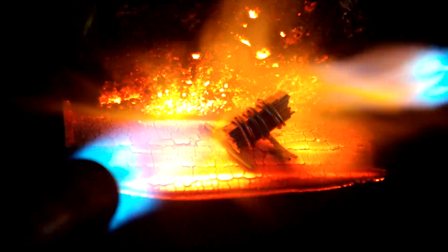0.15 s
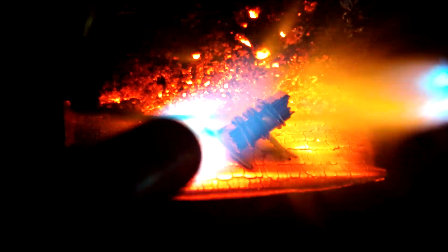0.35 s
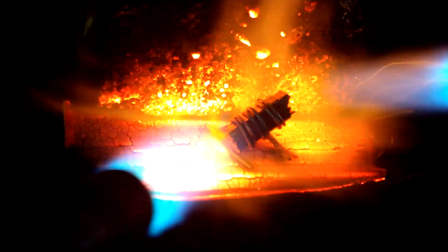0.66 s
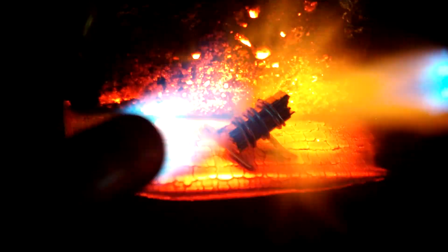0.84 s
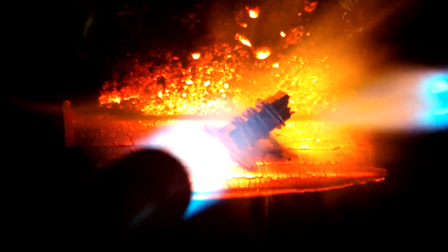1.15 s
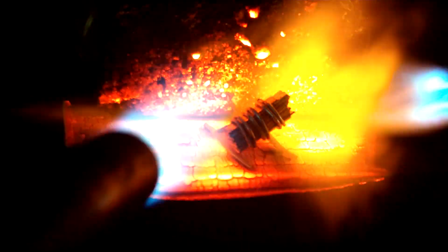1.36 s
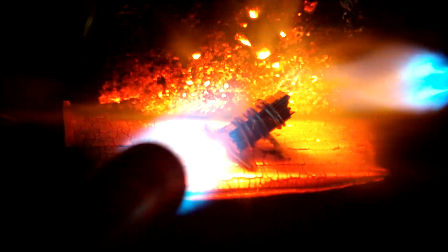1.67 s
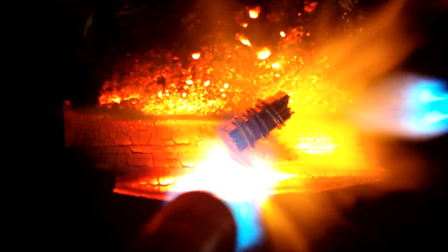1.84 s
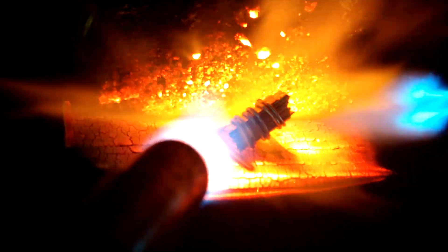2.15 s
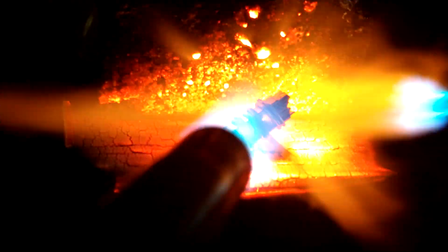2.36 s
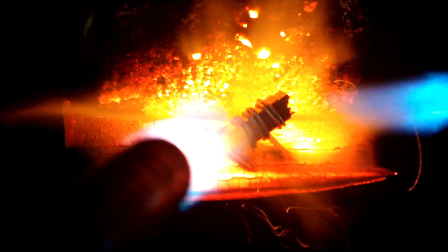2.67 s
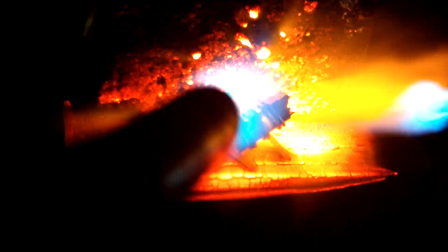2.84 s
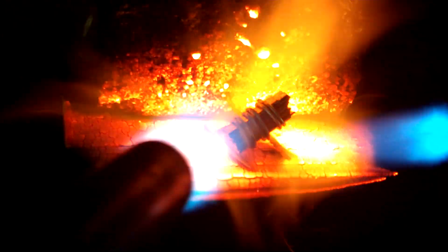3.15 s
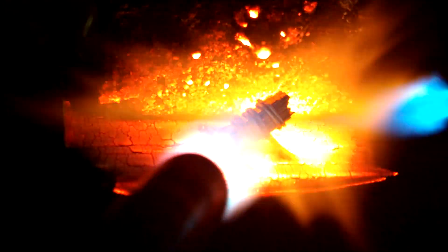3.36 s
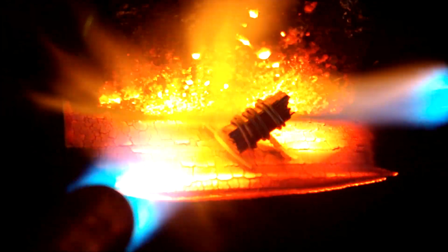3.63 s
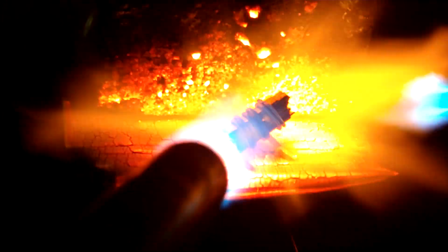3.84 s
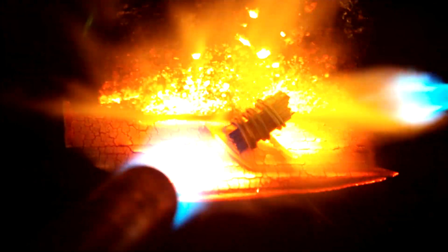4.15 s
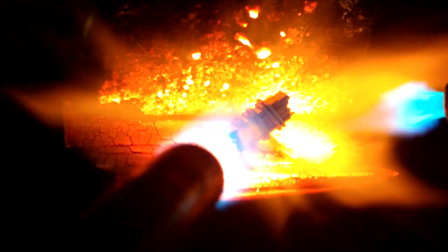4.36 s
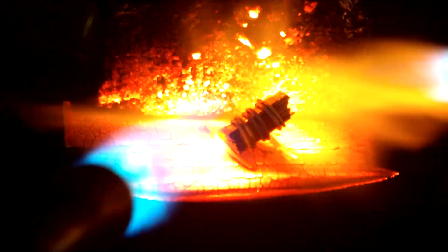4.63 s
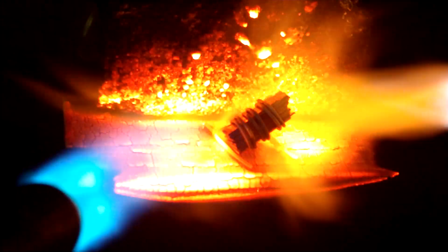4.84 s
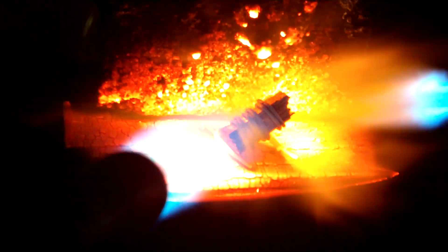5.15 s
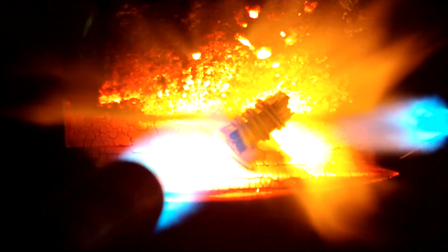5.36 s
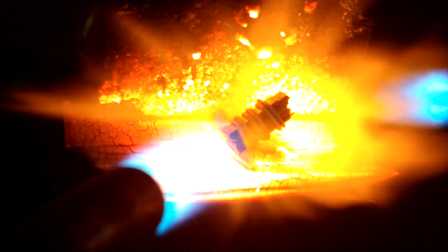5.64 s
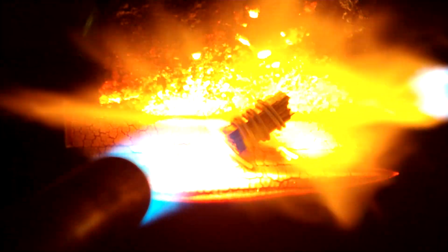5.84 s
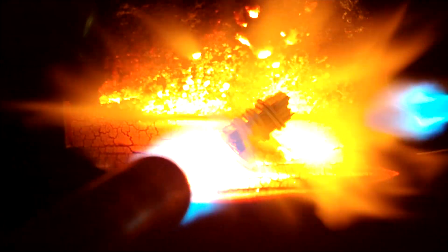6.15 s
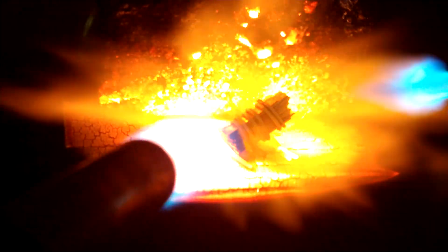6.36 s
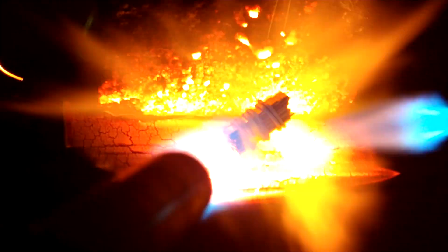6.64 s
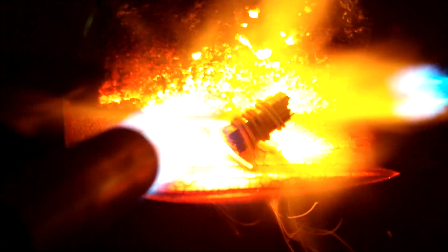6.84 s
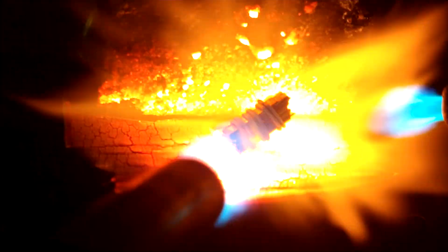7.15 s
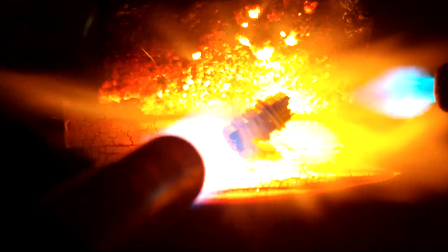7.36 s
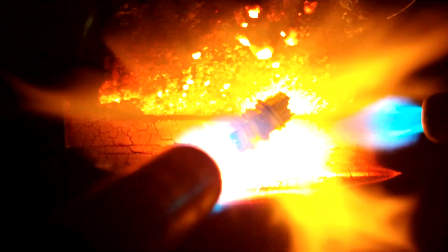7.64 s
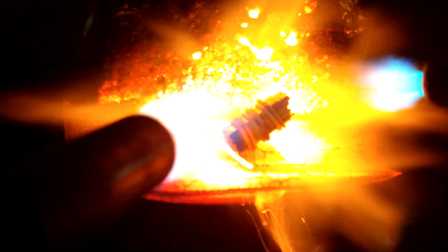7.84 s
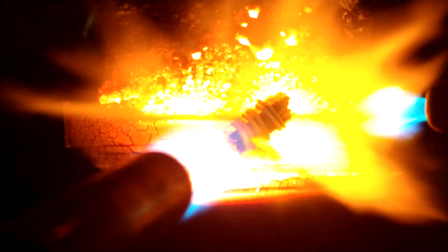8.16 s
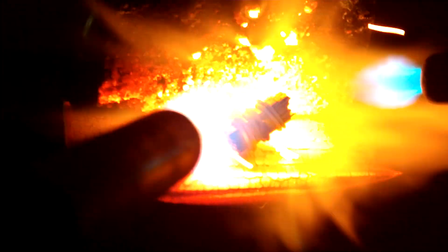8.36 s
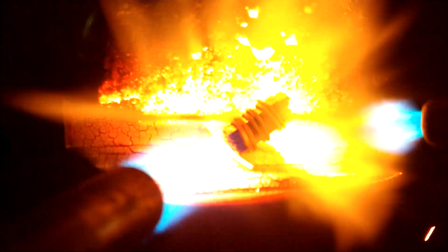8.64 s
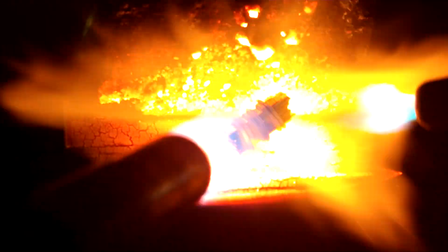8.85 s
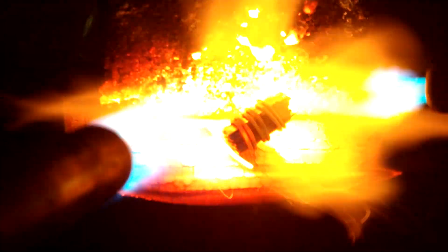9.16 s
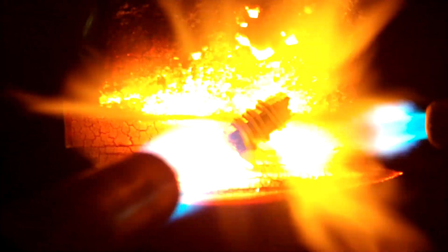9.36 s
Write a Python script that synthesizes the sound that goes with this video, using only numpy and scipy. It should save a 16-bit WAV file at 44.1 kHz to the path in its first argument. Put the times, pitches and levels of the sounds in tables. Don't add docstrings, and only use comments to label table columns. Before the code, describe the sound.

Close, constant torch roar in a small room, starting at full force and never stopping. It is a thick rush of gas with little deep bass and a slightly dulled top. Rough, hollow tube tones waver within it, the higher one pulsing and climbing in pitch early on. Small gusts and shifting reflections flutter the hiss; the overall level stays tightly held.

```python
import sys
import numpy as np
from scipy import signal
from scipy.fft import rfft, irfft
from scipy.io import wavfile
from scipy.ndimage import uniform_filter1d

SR = 44100
rng = np.random.default_rng(int(sys.argv[2]) if len(sys.argv) > 2 else 0)


def attenuation_scalar(level_db):
    decades = np.asarray(level_db, float) / 20
    return 10 ** decades


def master(y):
    cut = np.clip(np.atleast_2d(y).T, -1, 1)
    pcm = np.round(cut * 32767)
    wavfile.write(sys.argv[1], SR, pcm.astype(np.int16))


N = 418950
SIZE, HOP = 2048, 512


def evened(x):
    return x / np.sqrt(np.mean(x ** 2) + 1e-20)


def bump(hz, centre_hz, width_hz):
    return 2. ** (-(2 * (hz - centre_hz) / width_hz) ** 2)


def below(hz, edge_hz):
    return 1 / (1 + (hz / edge_hz) ** 8)


def plateau(t, start, end, edge_s):
    rise = np.tanh((t - start) / edge_s)
    fall = np.tanh((t - end) / edge_s)
    return (rise - fall) / 2


def drift(shape, bins, frames):
    field = uniform_filter1d(rng.standard_normal(shape), size=bins, axis=0)
    return evened(uniform_filter1d(field, size=frames, axis=1))


def slow_noise(width_hz):
    pole = np.exp(-np.pi * width_hz / SR)
    z = rng.standard_normal((N, 2)) @ [1, 1j]
    return signal.lfilter([1], np.poly([pole, pole]), z)


# centre in Hz, width in Hz, lift in dB.
ROOM_MODES = [(95, 22, 3.5), (135, 20, -3), (156, 16, 4), (197, 25, -3), (217, 14, 3), (260, 25, -3),
              (287, 20, 3), (322, 20, -4.5), (355, 20, 3), (388, 20, -5), (428, 14, 3.5), (765, 45, 1.2),
              (850, 60, -1)]


def room(x):
    hz = np.fft.rfftfreq(N, 1 / SR)
    modes_db = sum(db * bump(hz, f, w) for f, w, db in ROOM_MODES)
    return irfft(rfft(x) * attenuation_scalar(modes_db), N)


def charcoal_spit(middle_s=8.362, half_s=.017, hz=4810, rise_hz_per_s=-800, db=-27):
    t = np.arange(N) / SR - middle_s
    cycles = hz * t + rise_hz_per_s * t ** 2 / 2
    return attenuation_scalar(db) * np.exp(-(t / half_s) ** 4) * np.sin(2 * np.pi * cycles)


def singing(events, rest_db, t):
    wander_hz, throb_db, edge_s = 9, .5, 0.029
    start, length, from_hz, to_hz, db = np.transpose(events)
    end = start + length
    times = np.maximum.accumulate(np.ravel([start, end], "F"))
    pitch_hz = np.interp(t, times, np.ravel([from_hz, to_hz], "F"))
    pitch_hz = pitch_hz + wander_hz * drift((1, len(t)), bins=1, frames=3)[0]
    lift_db = (db - rest_db) @ plateau(t, start[:, None], end[:, None], edge_s)
    level_db = rest_db + lift_db + throb_db * drift((1, len(t)), bins=1, frames=6)[0]
    return [np.interp(np.arange(N) / SR, t, curve) for curve in (pitch_hz, level_db)]


def tube(pitch_hz, level_db, width_hz, steady):
    flutter_db, flutter_hz = 1.6, 40
    swing = slow_noise(width_hz)
    swing = swing / (abs(swing) + 1e-9) ** np.clip(steady, 0, 1)
    tone = (swing * np.exp(2j * np.pi * np.cumsum(pitch_hz) / SR)).real
    flicker_db = flutter_db * evened(slow_noise(flutter_hz).real)
    return attenuation_scalar(level_db) * evened(tone * attenuation_scalar(flicker_db))


# start in seconds, length in seconds, first pitch in Hz, last pitch in Hz, level in dB.
LOWER_SWELLS = [(0.0, .08, 797, 780, -20), (.12, 0.1394, 820, 780, -22.5), (.27, 0.0995, 751, 750, -22),
                (.4, 0.21, 780, 805, -22.5), (.7, 0.3544, 767.5, 791, -20.5), (1.27, 0.098, 780, 820, -23),
                (1.45, .15, 789.7, 770, -24.5), (1.75, 0.1988, 792.4, 759, -24),
                (2.02, 0.199, 771.4, 800, -22), (2.33, 0.10035, 790.5, 810, -23),
                (2.5, .62, 780.8, 809.4, -24.5), (3.65, .68, 813, 780.2, -25), (4.37, .25, 770.6, 790, -23),
                (4.85, 0.351, 771, 791.3, -23), (5.38, .2, 789, 772, -26), (5.7, .5, 799.4, 782, -23.5),
                (6.35, .17, 763, 740, -22), (6.53, .45, 790, 760, -24.5), (7.2, .15, 799, 794, -23.5),
                (7.5, 0.478, 796, 759.5, -24), (8.05, .12, 780, 800, -20.5), (8.19, 0.081, 810, 797.5, -19),
                (8.3, .12, 780, 771, -24), (8.55, .16, 810, 770, -22.5), (8.95, .1, 806, 810, -27),
                (9.12, .07, 790, 765.8, -25), (9.24, .12, 783, 762, -21.5)]


def lower_tube(t):
    pitch_hz, level_db = singing(LOWER_SWELLS, -27, t)
    return tube(pitch_hz, level_db, width_hz=95, steady=0.68)


# start in seconds, length in seconds, first pitch in Hz, last pitch in Hz, level in dB.
UPPER_SURGES = [(0.0, 0.16, 880, 960, -25), (.15, 0.097, 1050, 1044, -21), (.4, .14, 920.4, 870, -23),
                (.6, 0.2, 870.8, 930, -20.5), (1.95, .09, 964.3, 980, -25), (2.1, 0.16, 830.5, 915, -25),
                (2.36, .06, 830, 860, -24), (2.49, 0.11, 849.2, 970, -22), (2.69, .35, 955, 1015, -23),
                (3.07, 0.52, 1005, 1005, -21), (3.54, .1, 998.5, 952, -31), (3.66, .15, 951.2, 1019, -22.5),
                (3.85, 0.077, 1070, 1054, -24), (3.96, .14, 969, 1060, -24), (4.13, .18, 1038, 1023, -27.5),
                (4.33, 0.4, 999.5, 1038, -24), (4.85, .38, 1059, 1095, -27.5),
                (5.27, 0.26, 1033, 1062, -22.5), (5.53, .12, 1050, 1005, -21.5),
                (5.66, .13, 1030, 1060, -19.5), (5.88, 0.37, 1033, 1055, -26),
                (6.31, .13, 1009, 1044, -19.5), (6.47, 0.078, 1044, 1030, -20),
                (6.6, 0.16, 1034, 1018, -21), (6.77, 0.19, 1037, 1032, -25),
                (7.06, 0.076, 1061, 1076, -22.5), (7.22, .16, 1022, 1036, -23),
                (7.39, 0.19, 1012, 988, -21), (7.58, .17, 1025, 1050, -23.5),
                (7.79, 0.18, 971.6, 1020, -22), (8.03, 0.073, 990, 1021, -20),
                (8.2, 0.076, 1083, 1050, -26), (8.33, 0.15, 944.5, 1028, -21.5),
                (8.47, 0.12, 1010, 950, -23), (8.71, 0.18, 1039, 1064, -25),
                (8.92, 0.16, 1047, 1062, -21.5), (9.09, .045, 1046, 800, -19), (9.22, .09, 1025, 1028, -30),
                (9.32, 0.066, 1038, 1032, -20.5), (9.43, 0.084, 1023, 1026, -19.5)]


def upper_tube(t):
    pitch_hz, level_db = singing(UPPER_SURGES, -33.5, t)
    return tube(pitch_hz, level_db, width_hz=62, steady=0.7)


# frequency in Hz, level in dB per Hz.
FLAME_COLOUR = [(20, -46), (50, -36), (70, -33), (95, -17), (200, -8.5), (400, -2.5), (800, -6.5),
                (1600, -6.5), (3200, -13), (6000, -14.5), (7850, -11.5), (8050, -27), (8400, -37),
                (8800, -51)]
# centre in Hz, width in Hz, lift in dB.
STANDING_PATHS = [(139.2, 92, 8), (334, 44, -8), (354.7, 19, 13), (366, 157, -13), (445, 86, -3.5),
                  (586, 98, -4), (888, 514, 4.5), (1230, 48, 3.5), (1475, 100, -3.5), (1913, 256, -5),
                  (2512, 49, -6), (2543, 66, 5.5), (2860, 470, -3), (3243, 99, 2), (3646, 130, -3.5),
                  (3853, 72, 3.5), (4355, 55, -9.5), (5060, 200, -4), (6050, 300, -1), (6517, 515, 8),
                  (7140, 270, 0), (7550, 140, 0.5), (7900, 280, -9.5)]


def steady_colour(hz):
    f, level_db = np.transpose(FLAME_COLOUR)
    colour_db = np.interp(np.log(hz + 1), np.log(f + 1), level_db)
    return colour_db + sum(db * bump(hz, f, w) for f, w, db in STANDING_PATHS)


# time in seconds, hiss of the gas jets in dB.
TORCH_NEARNESS = [(0.0, -15.5), (0.13, -17.5), (0.33, -15.5), (0.9, -17), (1.4, -19), (1.9, -19.5),
                  (2.2, -19.5), (3.3, -19.5), (3.8, -19.5), (4.5, -19.5), (5.0, -19.5), (6.3, -20.5),
                  (6.85, -20.5), (7.1, -20.5), (9.3, -20), (9.5, -19.5)]


def nearness(hz, t):
    far_db = -20
    near_db = np.interp(t, *np.transpose(TORCH_NEARNESS)) - far_db
    roar_db = -0.17 + (0.92 - 1) * near_db
    rumble_db = -2.5 + (0.8 - 1) * near_db - 0.3 * drift((1, len(t)), bins=1, frames=6)
    roar_band, rumble_band = below(hz, 1410), below(hz, 330)
    return far_db + near_db - 12 + (roar_band - rumble_band) * roar_db + rumble_band * rumble_db


# start in seconds, end in seconds.
HAND_POSES = [
    (-1, 1.05),
    (1.05, 3.55),
    (3.55, 4.67),
    (4.67, 5.95),
    (5.95, 11),
]
# centre in Hz, width in Hz, lift in dB.
CLOSE_PATHS = [(334, 154, -8), (980, 130, 0.5), (1113, 50, -5), (1717, 120, -8), (2810, 190, -4.5),
               (3160, 230, 5), (3360, 140, -3), (3900, 120, 1.5), (3920, 140, -0.5), (4450, 240, -10),
               (4760, 62, -1), (5620, 1430, 6.5), (5740, 310, -5.5), (8000, 1400, 3)]
AIMED_PATHS = [(1730, 130, -1.5), (3000, 650, -1.5), (3200, 100, 3), (3880, 140, 4.5), (4150, 120, -3.5),
               (4540, 190, -1), (5300, 630, 0), (6600, 800, 0.4)]
TURNED_PATHS = [(3900, 140, 1), (4090, 140, -6), (4390, 370, 2), (5100, 940, -2.5), (6600, 600, -1.5)]
DRAWN_BACK_PATHS = [(885, 82, -2.5), (2240, 1500, 0.5), (3780, 500, -2.5), (4200, 590, -2),
                    (5090, 140, -1.5), (5300, 640, 3.5), (7600, 1700, -5.5)]
SETTLED_PATHS = [(854, 90, -4), (1830, 200, 2.5), (2050, 180, -3.5), (2887, 70, -0.5), (3540, 220, 1.5),
                 (3800, 140, -2.5), (4200, 520, 1), (4760, 80, -1), (5060, 200, -2.5), (5640, 1400, -1.5),
                 (5840, 140, 0), (6710, 560, -3), (6820, 100, 3.5), (7820, 800, 0.5)]


def pose_reflections(hz, t):
    pose_paths = (CLOSE_PATHS, AIMED_PATHS, TURNED_PATHS, DRAWN_BACK_PATHS, SETTLED_PATHS)
    field_db = 0
    for (start, end), paths in zip(HAND_POSES, pose_paths):
        f, w, db = np.transpose(paths)
        depth = np.minimum(50 / w, .3)[:, None]
        waver = 1 + depth * drift((len(f), len(t)), bins=1, frames=3)
        held = plateau(t, start, end, edge_s=.13)
        field_db = field_db + db * bump(hz, f, w) @ (waver * held)
    return field_db


# middle in seconds, half length in seconds, centre in Hz, width in Hz, lift in dB.
SWEEP_GLINTS = [(.78, 0.33, 3220, 150, 3), (5.296, .2, 5450, 258, -1), (1.501, .4, 4480, 250.3, -5),
                (1.702, 0.31, 5300, 805, -2), (2.677, 0.15, 4436, 220, 9.5), (3.158, 0.15, 4420, 320, 9.5),
                (3.2, .2, 3200, 500, 1.5), (2.701, 0.73, 5100, 426, 4), (2.923, 0.063, 5100, 900, 4.5),
                (4.9, 0.23, 3800, 497.7, -5), (4.85, .12, 4550, 200, 3), (5.05, 0.11, 5300, 500, 0.5),
                (5.599, 0.55, 4450, 299.8, -3.5), (6.701, .36, 3034, 220.5, -4.5),
                (9.147, 0.027, 1142, 500, -6), (.12, 0.13, 3900, 250, -3.5), (.6, 0.27, 1260, 120, 1.5),
                (.6, 0.099, 4200, 200, 6), (1.83, 0.11, 6510, 1300, -2.5), (1.9, .12, 3900, 200, -2),
                (2.902, .5, 3620, 250, 2.5), (3.703, .1, 6690, 1504, -2), (4.216, 0.096, 6040, 1794, -1.5),
                (4.399, .2, 3610, 200, 0), (5.45, 0.55, 5420, 220, -0.5), (5.201, .3, 4780, 180, 2),
                (5.3, .12, 4300, 250, -6), (5.702, 0.31, 7450, 600, 3.5), (5.77, .04, 1239, 119.5, 5),
                (6.05, .12, 7650, 506, -4), (6.95, 0.17, 4150, 350, 4), (7.3, 0.14, 4020, 400.2, -0.5),
                (7.6, .25, 3000, 249, -2.5), (8.55, .15, 3982, 400, 3.5), (8.78, 0.093, 1230, 120, 5.5),
                (9.202, .3, 5090, 200.4, 7), (9.298, 0.21, 7600, 501, -1.5), (8.171, 0.071, 980, 120.4, -4)]
# middle in seconds, half
# length in seconds, centre in Hz, width in Hz, lift in dB.
MORE_GLINTS = [(2.24, .12, 6500, 500, 0.5), (2.55, .1, 6500, 500, 2), (3.05, .1, 6500, 600, 2),
               (3.4, .12, 6500, 500, 0.5), (4.0, .1, 6550, 500, 2), (4.45, .1, 6500, 500, 2.5),
               (5.09, .38, 5450, 160, 6.5), (4.95, .25, 5050, 160, 6), (4.7, .14, 5500, 700, -2),
               (2.9, .04, 4500, 2200, -1.5), (2.8, .05, 4400, 1500, 2), (1.45, .05, 4900, 160, 2),
               (5.75, .12, 4400, 200, 6), (2.35, .06, 3890, 160, 0), (3.2, .1, 3600, 160, 4),
               (6.45, .12, 7500, 300, 1), (6.9, .1, 8100, 300, 3), (7.6, .2, 7500, 300, 1),
               (8.3, .15, 7500, 400, 1.5), (8.8, .1, 7500, 300, 0), (7.1, .1, 5150, 300, 1),
               (6.2, .12, 5150, 250, 2), (8.2, .15, 6100, 300, -2), (7.4, .15, 5200, 500, 0),
               (4.3, .2, 6500, 500, -1.5), (1.6, .35, 3700, 200, 0), (5.5, .3, 2100, 500, 1.5),
               (7.0, .15, 3400, 300, 1), (6.4, .2, 2950, 200, -1), (2.2, 0.13, 1700, 360, 3),
               (5.95, .2, 860, 90, 0), (6.3, .15, 1260, 90, 3), (7.7, .2, 1250, 90, 2),
               (9.3, .15, 1200, 120, 3), (5.6, .1, 780, 200, 0), (8.3, .3, 1300, 250, 1),
               (9.2, .04, 1150, 300, -2), (5.1, .1, 450, 200, 2), (2.35, .15, 760, 150, -2)]


def passing_bands(hz, t):
    middle, half, f, w, db = np.transpose(SWEEP_GLINTS + MORE_GLINTS)
    moment = np.exp(-((t - middle[:, None]) / half[:, None]) ** 4)
    return db * bump(hz, f, w) @ moment


def turbulence(gain):
    a, b = rng.standard_normal((gain.shape[1], gain.shape[0], 2)).T
    return signal.istft(gain * (a + 1j * b), nperseg=SIZE, noverlap=SIZE - HOP)[1][:N]


def flames(t, patchy_db=0.64, fine_db=1.4):
    hz = np.fft.rfftfreq(SIZE, 1 / SR)[:, None]
    field_db = steady_colour(hz) + nearness(hz, t)
    field_db += pose_reflections(hz, t)
    field_db += passing_bands(hz, t)
    shape = field_db.shape
    field_db += patchy_db * drift(shape, bins=24, frames=6) * (1 - below(hz, 3900))
    field_db += fine_db * drift(shape, bins=5, frames=30)
    return turbulence(attenuation_scalar(field_db))


def scene():
    t = np.arange(N // HOP + 2) * HOP / SR
    mix = room(flames(t)) + lower_tube(t) + upper_tube(t) + charcoal_spit()
    return mix[None]


def band_limit(x):
    return signal.sosfilt(signal.butter(12, 8900, fs=SR, output="sos"), x)


def record(dry, squeeze=0.055):
    power = dry ** 2
    quick = uniform_filter1d(power, size=500, axis=1) + 1e-9
    slow = uniform_filter1d(power, size=9000, axis=1) + 1e-9
    ironed = dry * (slow / quick) ** squeeze
    held = ironed / (1 + abs(ironed / .95) ** 6) ** (1 / 6)
    rumble_cut = signal.butter(2, 38, "high", fs=SR, output="sos")
    held = signal.sosfilt(rumble_cut, held)
    treble_cut = signal.firwin(401, 8480, window=("kaiser", 4), fs=SR)
    mix = signal.oaconvolve(held, treble_cut[None], "same")
    return band_limit(mix)


dry = scene()
out = record(dry)
master(out)
```